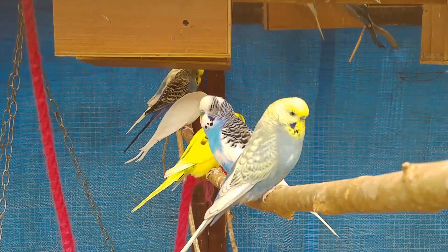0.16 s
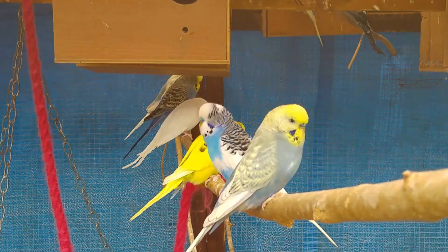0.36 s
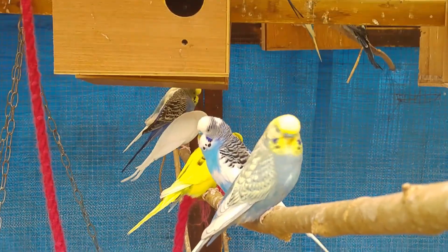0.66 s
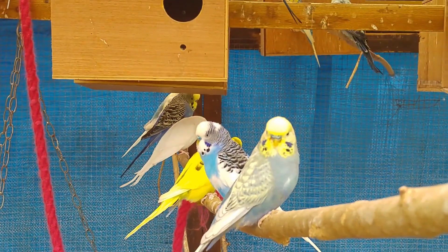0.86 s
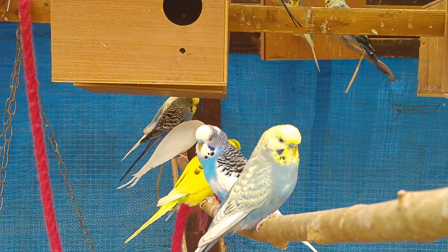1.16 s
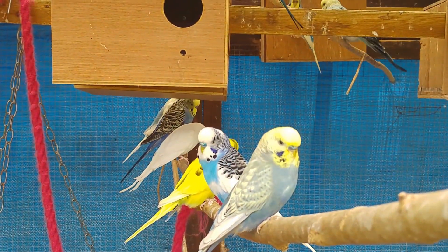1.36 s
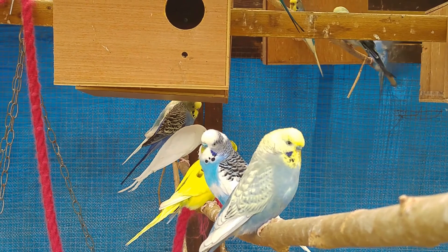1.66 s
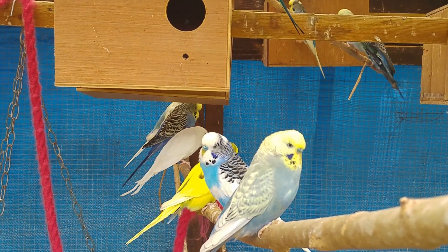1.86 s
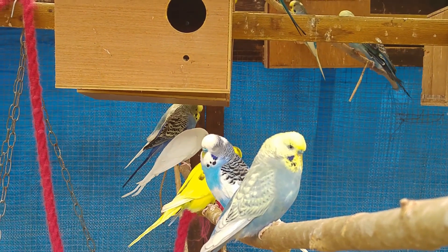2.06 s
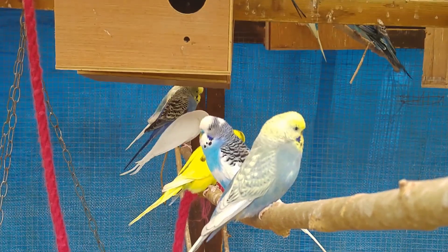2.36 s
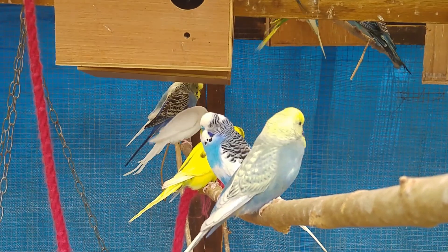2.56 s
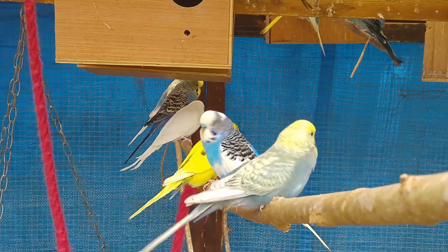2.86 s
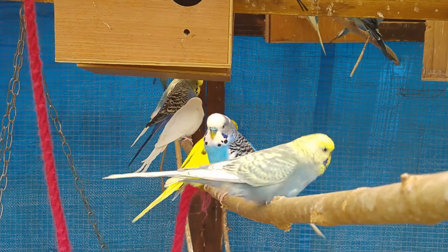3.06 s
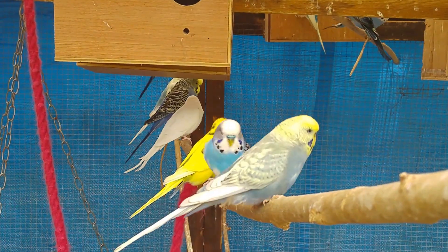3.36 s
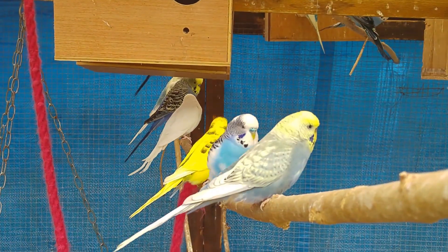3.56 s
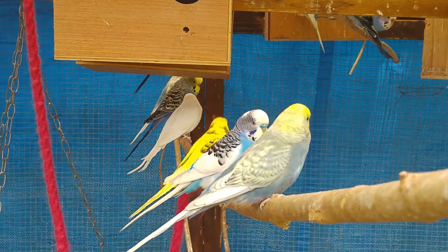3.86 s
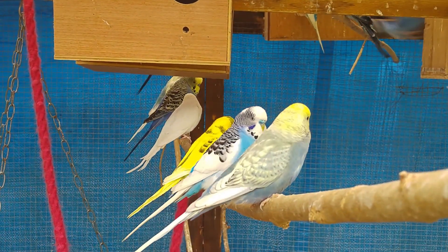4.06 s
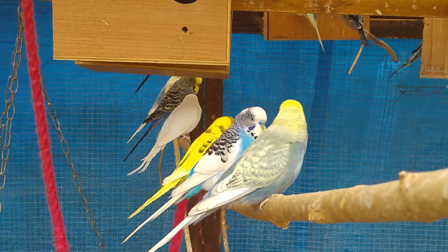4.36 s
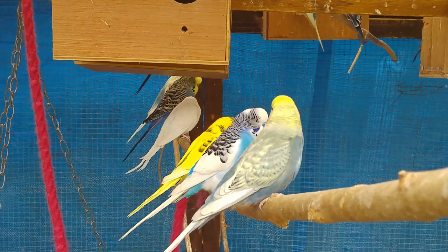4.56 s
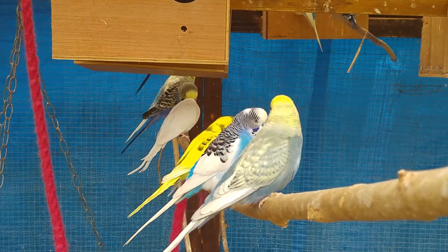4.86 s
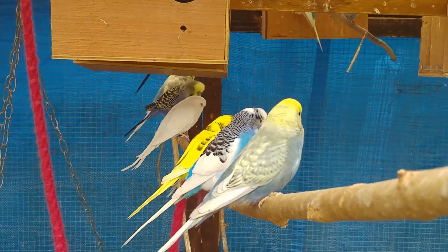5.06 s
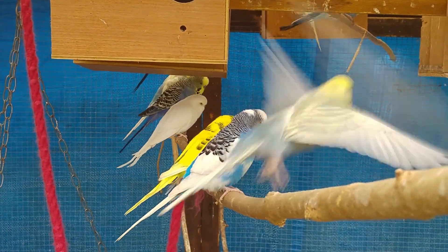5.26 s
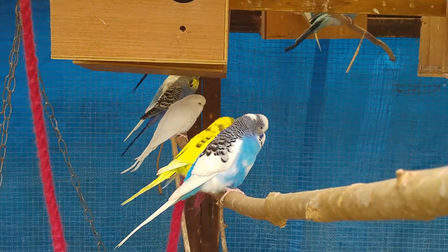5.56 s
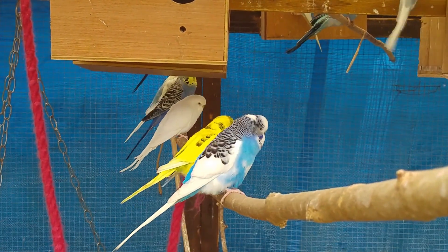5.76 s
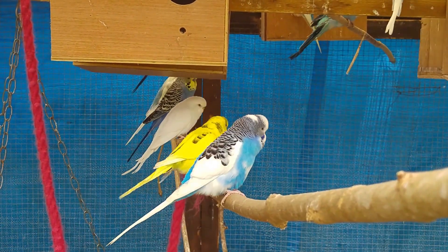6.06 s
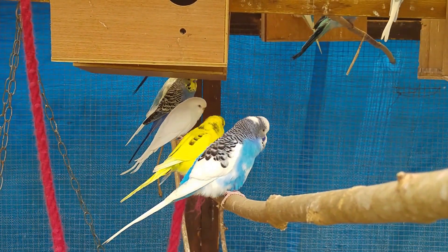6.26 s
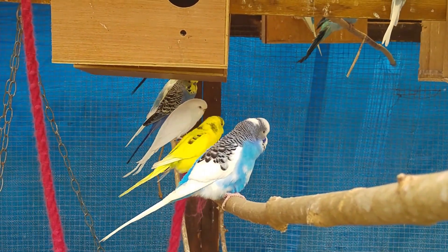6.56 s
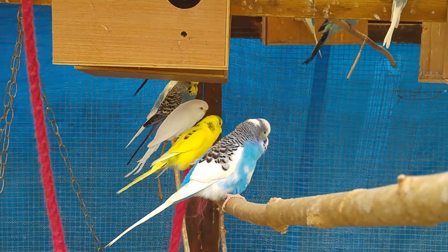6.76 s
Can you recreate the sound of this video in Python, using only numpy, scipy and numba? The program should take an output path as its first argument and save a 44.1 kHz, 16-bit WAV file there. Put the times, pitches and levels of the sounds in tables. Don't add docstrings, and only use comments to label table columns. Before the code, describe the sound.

Dry, bright budgie squawks come several per second, buzzing and hissy, peaking just before a soft burst of wing beats. Then calls become more spaced and throaty, mixed with tiny sliding whistles, low mutters and clicks on wire. Far birds chirp over light wind rumble; the wooden enclosure gives only a short, dull echo near the handheld microphone.

```python
import sys
import numpy as np
from scipy import signal
from scipy.fft import rfft, irfft
from scipy.io import wavfile
from scipy.ndimage import uniform_filter1d, map_coordinates
from numba import njit

SR = 44100
rng = np.random.default_rng(int(sys.argv[2]) if len(sys.argv) > 2 else 0)


def master_out(mix):
    frames = np.transpose(np.atleast_2d(mix))
    ceiling = np.clip(frames, -1, 1)
    pcm = np.round(ceiling * 32767).astype(np.int16)
    wavfile.write(sys.argv[1], SR, pcm)


def invert_db(x):
    u = np.asarray(x, float) / 20
    return 10 ** u


N = 303849
T = np.arange(N) / SR


def unit(x):
    return x / np.sqrt(np.mean(x ** 2))


def noise():
    return rng.standard_normal(N)


def walk(rate):
    hold = max(int(SR / rate), 1)
    steps = np.repeat(rng.standard_normal(N // hold + 1), hold)
    slewed = uniform_filter1d(uniform_filter1d(steps, hold), hold)[:N]
    return slewed / slewed.std()


@njit
def svf(x, hz, width):
    y, b, l = np.empty(len(x)), 0., 0.
    for i in range(len(x)):
        g, k = np.tan(np.pi * hz[i] / SR), width / hz[i]
        v = (b + g * (x[i] - l)) / (1 + g * (g + k))
        b, l, y[i] = 2 * v - b, l + 2 * g * v, k * v
    return y


def band(x, hz, width):
    hz = np.clip(hz + 0 * T, 20, .45 * SR)
    once = svf(x, hz, 1. * width)
    return unit(svf(once, hz, 1. * width))


def colour(x, points):
    hz, db = np.transpose(points)
    f = np.arange(N // 2 + 1) * SR / N + 1
    gain = invert_db(np.interp(np.log(f), np.log(hz), db))
    return unit(irfft(rfft(x) * gain, N))


def mottle(x, depth_db, rate):
    f, t, z = signal.stft(x, SR, nperseg=256)
    grid = np.meshgrid(f / 330, t * rate, indexing="ij")
    field = map_coordinates(rng.standard_normal((80, 800)), grid, order=1, mode="mirror")
    z = z * invert_db(depth_db * field / field.std())
    return unit(signal.istft(z, SR, nperseg=256)[1][:N])


def throb(hz, sharp, scatter_db):
    phase = np.cumsum(hz) / SR
    size = invert_db(scatter_db * rng.standard_normal(N // 50))[phase.astype(int)]
    phase = (phase % 1) ** .6
    bump = np.exp(sharp * np.cos(2 * np.pi * (phase - .5)))
    return size * bump / np.sqrt(np.i0(2 * sharp))


def syrinx(beak_hz):
    beat_hz = beak_hz / 3 * (1 + .04 * walk(600) + .02 * walk(60))
    beat = 2 * np.pi * np.cumsum(beat_hz) / SR
    buzz = sum(np.cos(k * beat) for k in range(1, 8))
    return .35 * unit(buzz) + noise()


def lungs(start, end, peak_db, place):
    swell_db, fade_db = 11, 14.5
    attack, release = 0.14, 0.16
    gain = np.zeros(N)
    for a, b, db, top in zip(start, end, peak_db, place):
        on = slice(int(max(a - .002, 0) * SR), int((b + .01) * SR))
        to_top = (T[on] - a) / (b - a) - top
        corners = [a - .002, a + 0.0051, a + attack * (b - a), b - release * (b - a), b, b + 0.017]
        edges_db = np.interp(T[on], corners, [-17.0, -3.0, -0.5, 3, -4.0, -20])
        gain[on] += invert_db(db + edges_db + np.minimum(swell_db * to_top, -fade_db * to_top))
    return gain


def squawks():
    # start and end in seconds, peak in
    # dB, place of the peak (0-1), beak resonance it snaps to in Hz.
    scolding = [(0.0, 0.054, -16, 0, 7240), (0.087, 0.199, -15, 0.4, 5860),
                (0.273, 0.363, -14.5, 0.21, 6164), (0.388, 0.435, -20, 0.47, 6930),
                (0.442, 0.504, -16, 0.31, 6980), (0.501, 0.561, -18, 0.34, 6104),
                (0.568, 0.629, -15.5, 0.48, 6980), (0.64, 0.745, -13, 0.74, 7240),
                (0.769, 0.862, -18, 0.61, 7150), (0.917, 0.991, -16, 0.53, 5900),
                (1.044, 1.106, -17, 0.57, 6980), (1.172, 1.234, -15.5, 0.33, 6980),
                (1.23, 1.282, -19.5, 0.52, 6460), (1.296, 1.359, -15.5, 0.42, 6930),
                (1.401, 1.491, -16, 0.59, 7240), (1.487, 1.559, -16.5, 0.43, 6550),
               (1.566, 1.636, -13.5, 0.2, 6980), (1.664, 1.798, -16, 0.49, 6450),
               (1.842, 1.969, -16, 0.64, 6070), (2.006, 2.13, -15.5, 0.75, 6340),
               (2.128, 2.211, -23, 0.81, 6890), (2.204, 2.319, -15, 0.53, 6720),
               (2.328, 2.405, -14.5, 0.3, 7420), (2.434, 2.527, -9, 0.63, 7060),
               (2.566, 2.717, -14, 0.86, 6458), (2.723, 2.765, -25.5, 0.48, 9870),
               (2.79, 2.905, -12.5, 0.7, 6750), (2.905, 2.975, -10.5, 0.54, 4270),
               (2.99, 3.128, -11.5, 0.97, 6036)]
    answering = [(3.448, 3.545, -17.5, 0.33, 3450), (3.683, 3.765, -37, 0.52, 3400),
                 (3.835, 3.885, -14.5, 0.65, 4800), (3.955, 4.08, -16.5, 0.58, 4840),
                 (4.128, 4.182, -10, 0.4, 3830), (4.195, 4.252, -21.5, 0.4, 3040),
                 (4.448, 4.508, -11.5, 0.55, 3950), (4.64, 4.702, -31, 1, 3410),
                 (4.903, 5.019, -27, 0.46, 3400), (5.019, 5.113, -22, 0.36, 3070),
                 (5.14, 5.21, -17, 0.5, 4470), (5.306, 5.353, -18, 0.5, 4990),
                 (5.432, 5.502, -12.5, 0.08, 3200), (5.491, 5.563, -19, 0.4, 2790),
                 (5.663, 5.751, -11, 0.49, 6910), (5.893, 5.986, -18.5, 0.56, 3134),
                 (6.04, 6.112, -14, 0.39, 4280), (6.155, 6.225, -16, 0.56, 4110),
                 (6.264, 6.308, -13.5, 0.54, 3864), (6.311, 6.381, -14, 0.31, 4060),
                 (6.413, 6.544, -15, 0.53, 3840), (6.564, 6.644, -14, 0.49, 4060),
                 (6.739, 6.816, -13.5, 0.47, 3980)]
    answer_beak_hz = [7060, 6720, 6850, 5210, 6800, 6550, 5900, 6590, 7280, 6630, 7404, 5900, 6330, 5900,
                      7110, 6140, 5940, 6930, 7980, 7360, 7300, 6800, 6850]
    # opening beak resonance in Hz, beak ring in dB, breath brightness in dB.
    gapes = [(6890, -7, 7), (7076, -2, 7.5), (6720, 3, 2.5), (6980, 11.5, 1), (6890, 3, 7), (7110, 4, -3),
             (6930, 1, 2), (6800, -6, -14.5), (6550, 2.5, -3), (7060, -4, -4), (5940, 1, 3), (6980, 3, 7),
             (7060, -6, -4), (6930, 1, 5), (7207, -1, 4), (6890, -1, -2), (5617, 4, 2.5), (6980, 2, -0.5),
             (6720, -2, -2), (7150, -5, -3), (7280, 11.5, 4), (7504, -10, 3), (7240, 3, 3), (6402, -1, -6),
             (7110, 0, -9), (7110, -4, -5), (7150, 0, -8), (6192, 2, 5.0), (7040, -2, 1), (6720, -6, 1),
             (6590, 4, 1), (5370, -5, 4), (6550, -3, 4), (6717, 5.5, -6), (6890, -1, 0.0), (6635, -7, 3),
             (6630, -5, 4), (7010, 5, -7), (6660, -1, 2), (6330, -1.5, -17), (6330, 7.5, 4), (6490, 1.5, 0),
             (6730, -1, 3), (7280, 9.5, -6.0), (5210, 6, 3), (5900, -3, 5), (7540, 3, 3), (6890, -5, 7),
             (7485, 11.5, 4.5), (5860, -20, 2), (7680, -7, 1), (6850, -14, 0)]
    # resonance in Hz, strength in dB.
    chests = [(2390, -3), (2150, 4.5), (2130, 8), (2360, -1), (2200, -1), (2090, -4), (2240, 0),
              (2200, -1.5), (2280, 5), (2150, 0), (2200, -4), (2200, -5), (2100, -13), (2057, -1),
              (2150, -3), (2280, -4.5), (2150, -3), (2150, 1.5), (2150, 0), (1658, 2.5), (2200, -12),
              (1770, 4), (2240, -22), (2270, -7.5), (2240, -4.5), (2200, 2), (2200, -11), (2350, -6),
              (1780, -1.5), (2368, -10), (2280, 16), (2520, 0), (2240, 1), (1690, 6), (2200, 1),
              (2200, -16), (2240, 16), (1720, 12), (2200, 8), (1476, 4), (1728, 3), (2390, 5), (2280, -12),
              (1503, -2), (2280, 4), (2240, 2), (2200, -1.5), (2200, -2), (2280, -0.5), (2200, 1),
              (2025, 0.5), (2150, -1)]
    rasps = [0.27, 0.34, 0.26, 0.83, 0.32, 0.37, 0.32, 0.1, 0.22, 0.34, 0.32, 0.41, 0.61, 0.53, 0.44, 0.44,
             0.27, 0.2, 0.41, 0.17, 0.71, 0.14, 0.19, 0.31, 0.22, 0.94, 0.26, 0.22, 0.58, 0.08, 0.07, 0.2,
             0.02, 0.12, 0.14, 0.1, 0.05, 0.12, 0.12, 0.1, 0.26, 0.12, 0.2, 0.51, 0.15, 0.26, 0.17, 0.29,
             0.37, 0.07, 0.14, 0.02]
    # time in seconds, turn away from the phone (0-1).
    head = [(0, 0.96), (.3, 0.04), (1.1, 0.04), (1.898, 0.13), (2.27, 0.57), (2.599, 0.21), (2.85, 0.16),
            (2.95, 0.8), (3.1, 0.47), (3.5, 0.45), (4.2, 0.87), (4.5, 0.16), (5.051, 1), (5.2, 0.13),
            (5.7, 0.55), (5.95, 1), (6.4, 0.91), (6.85, 0.87)]
    # frequency in Hz, level in dB per Hz.
    voice = [(530, -43), (900, -30.5), (1700, -36), (2140, -24), (2500, -19), (2890, -10), (4520, -10),
             (7060, 1), (7960, -5.5), (9770, -19.5), (16000, -46.5)]

    start, end, peak_db, place, tract_hz = np.transpose(scolding + answering)
    answers = start >= answering[0][0]
    early_hz, ring_db, bright_db = np.transpose(gapes)
    chest_hz, full_db = np.transpose(chests)
    late_hz = np.r_[tract_hz[~answers], answer_beak_hz]
    throat_hz = np.where(answers, tract_hz, 4050)
    rasp = np.array(rasps)
    turn = np.clip(np.interp((start + end) / 2, *np.transpose(head)), 0, 1)

    def turned(facing, away):
        return facing + (away - facing) * turn

    throat_db, chest_db = turned(-21, -6.5), turned(-16, -13.5)
    hiss_db, air_db = turned(0, -27), turned(-27, -30.5)
    palate_db, palate_hz = turned(-22, -29), turned(9960, 8170)
    beak_db = turned(-2.5, -14)
    shade = np.clip(turned(0.29, 0.73), 0, 1)

    which = np.clip(np.searchsorted(start - .012, T) - 1, 0, None)
    along = (T - start[which]) / (end - start)[which]
    snap = np.clip(9 * along - 4.3, 0, 1)
    beak_hz = early_hz[which] + (late_hz - early_hz)[which] * snap
    gain = lungs(start, end, peak_db, place)

    buzz = syrinx(beak_hz)
    puff_hz = 175.4 * (1 + .04 * rng.standard_normal(len(start))[which] + .02 * walk(150))
    early = np.clip(1 - 2 * along, 0, 1)
    sharp = (.04 + rasp[which]) * (1.25 + .55 * early)
    source = buzz * throb(puff_hz, sharp, scatter_db=1.2)

    body = mottle(colour(source, voice), depth_db=3.1, rate=24)
    body = body - shade[which] * svf(body, 6900 + 0 * T, 1600.0)
    beak = band(source, beak_hz * (1 + .03 * walk(70)), width=1250)
    beak = beak * invert_db(2.5 * walk(40) + (beak_db + ring_db)[which])
    throat = band(source, throat_hz[which] * (1 + .03 * walk(40)), width=1100)
    throat = throat * invert_db(throat_db[which] - 3 + 1.5 * walk(50))
    chest_glide = .96 + .08 * np.clip(along, 0, 1) + .04 * walk(30)
    chest = band(source, chest_hz[which] * chest_glide, width=420)
    chest = chest * invert_db((chest_db + full_db)[which] - 6 + 2.5 * walk(40))
    hiss = mottle(band(source, 7000, width=13200), depth_db=1.0, rate=14)
    hiss = hiss * invert_db((hiss_db + .5 * bright_db)[which] - 3.5)
    palate = band(source, palate_hz[which] * (1 + .03 * walk(30)), width=1400)
    palate = palate * invert_db(palate_db[which] + 3 * walk(25))
    air = band(np.roll(source, 70), 13800 * (1 + .08 * walk(12)), width=4000)
    air = air * invert_db((air_db + 1.6 * bright_db)[which] + 2 + 3 * walk(30))
    return gain * (invert_db(3.5) * body + beak + throat + chest + hiss + palate + air)


def whistles():
    # start and end in seconds, first and second pitch in Hz, dB.
    hooks = [
        (4.151, 4.16, 3050, 2803, -8.5),
        (4.522, 4.551, 2690, 3294, -8),
        (4.552, 4.575, 3273, 2776, -12.5),
        (5.402, 5.421, 2600, 2686, -18.5),
        (5.416, 5.442, 2790, 2910, -14.5),
        (5.598, 5.645, 3900, 3230, -27.5),
        (5.943, 5.96, 3090, 2870, -24),
    ]
    drops = [
        (4.082, 4.103, 2830, 3036, -14),
        (4.1, 4.113, 3090, 2720, -11),
        (5.014, 5.029, 3120, 2713, -14.5),
        (5.959, 5.99, 3155, 2740, -16),
        (4.9, 5.03, 853, 967, -32),
        (5.374, 5.415, 893, 1161, -28),
    ]
    arches = [
        (4.616, 4.65, 2660, 2770, -35.5),
        (4.993, 5.016, 2954, 2716, -16),
        (5.032, 5.056, 2840, 3050, -15.5),
        (5.07, 5.086, 3000, 2800, -22.5),
        (5.642, 5.671, 2506, 2548, -26),
        (5.992, 6.008, 2940, 3270, -15),
    ]
    single_notes = [(1.64, 2, 1830, 1634, -40), (3.34, 3.7, 2900, 3750, -42), (3.595, 3.648, 4990, 4950, -34),
                    (3.835, 3.863, 257, 251.6, -28.5), (4.124, 4.143, 3340, 2820, -9.5),
                    (4.272, 4.292, 1030, 1114, -25.5), (4.641, 4.667, 2490, 2720, -29.5),
                    (4.697, 4.8, 5980, 6460, -31.5), (4.75, 4.787, 972, 800, -36.5),
                    (4.772, 4.801, 2260, 2220, -26.5), (4.8, 4.862, 1000, 1100, -42),
                    (4.935, 4.965, 1600, 1780, -30.5), (5.36, 5.419, 6117, 6236, -29),
                    (5.454, 5.475, 3413, 3000, -19.5), (5.665, 5.698, 1447, 1585, -28.5),
                    (4.54, 4.565, 245, 225, -42.5), (3.604, 2.4, 4600, 4270, -40),
                    (3.628, 3.657, 5680, 5100, -45), (4.8, 4.4, 710, 1155, -43), (3.72, 3.8, 830, 740, -43.5),
                    (5.366, 5.4, 1700, 2800, -37), (4.815, 4.4, 1600, 1150, -40), (5.48, 5.495, 2650, 2600, -27),
                    (5.695, 5.74, 2700, 3700, -33), (4.975, 5.0, 2600, 2700, -22), (4.6, 4.62, 3300, 3200, -37)]
    more_notes = [(0.05, 0.1, 2700, 2050, -35.5), (0.228, 0.274, 4980, 3950, -29),
                  (1.008, 1.045, 2530, 2678, -36), (2.723, 2.74, 1091, 865, -35.5),
                  (3.9, 3.915, 3690, 3440, -29), (3.924, 3.936, 2280, 2820, -25.5),
                  (3.937, 3.952, 3640, 3560, -27), (3.948, 3.99, 2880, 2810, -32),
                  (3.99, 4.031, 1444, 1716, -33), (4.273, 4.322, 2100, 2380, -35),
                  (4.357, 4.369, 4170, 4050, -29.5), (4.385, 4.387, 2240, 2250, -25),
                  (4.452, 4.485, 951, 1287, -40.5), (4.582, 4.605, 1948, 1543, -39),
                  (4.66, 4.697, 3846, 2960, -33), (4.86, 4.9, 1206, 1001, -41), (5.028, 5.052, 1259, 1048, -32),
                  (4.158, 4.182, 5900, 5900, -26), (5.838, 5.852, 7050, 6800, -37),
                  (5.83, 5.855, 4620, 4600, -50), (3.39, 3.44, 7500, 7550, -50), (4.4, 4.45, 2046, 2150, -40),
                  (3.74, 3.83, 3150, 3030, -41), (4.8, 4.85, 6424, 6350, -52), (4.86, 4.91, 2280, 2200, -45),
                  (4.71, 4.74, 2670, 2953, -37.5), (4.743, 4.762, 1540, 1344, -39),
                  (5.111, 5.165, 1870, 1246, -31), (5.186, 5.213, 797, 1050, -34),
                  (5.218, 5.29, 1275, 1148, -41), (5.574, 5.596, 2700, 1400, -36),
                  (6.139, 6.182, 4050, 4030, -30.5), (6.001, 6.019, 1720, 963, -35),
                  (6.07, 6.083, 1091, 892, -40)]
    overtones_db = [-21, -38]
    shapes = [(hooks, 1, 1), (drops, 0, 1), (arches, 1, 0), (single_notes, .5, 1), (more_notes, .5, 1)]
    out = np.zeros(N)
    waver = .015 * walk(260)
    flutter = invert_db(3 * walk(240))
    for rows, middle, last in shapes:
        for a, b, first_hz, second_hz, db in rows:
            blur = 1 + first_hz / 2600 if db < -24 else 1
            middle_hz, last_hz = first_hz + (second_hz - first_hz) * np.array([middle, last])
            on = slice(int(a * SR), int(b * SR))
            t = T[on]
            hz = np.interp(t, [a, (a + b) / 2, b], [first_hz, middle_hz, last_hz])
            hz = hz * (1 + min(1, 2800 / first_hz) * waver[on])
            phase = 2 * np.pi * np.cumsum(hz) / SR
            rise, fall_s = (.3, 0.083 * (b - a)) if blur > 1 else (.55, .0015)
            swell = np.clip((t - a) / (rise * (b - a)), 0, 1) * np.clip((b - t) / fall_s, 0, 1)
            tone = np.sin(phase)
            for k, partial_db in enumerate(overtones_db, 2):
                partial = np.sin(k * phase + 3 * np.log(flutter[on]))
                tone = tone + invert_db(partial_db - 7.0 * (blur - 1)) * partial
            rough = flutter[on] ** (0.73 + 0.22 * (blur - 1))
            out[on] += np.sqrt(2) * invert_db(db) * swell * tone * rough
    return out


def wings():
    # time in seconds, level in dB.
    beats = [
        (2.875, -18.5),
        (2.931, -10),
        (2.985, -12),
        (3.04, -46),
        (3.085, -31),
        (3.219, -40),
        (4.139, -27),
        (4.3, -25),
        (5.399, -37),
        (5.75, -30.5),
    ]
    out, t = np.zeros(N + SR), T[:SR // 4]

    def ring(hz, t60_s):
        decay = np.exp(-np.log(1000) * t / t60_s)
        return np.sin(2 * np.pi * hz * t) * decay * np.clip(t / 0.0043, 0, 1)

    for (when, db), (a, b) in zip(beats, rng.standard_normal((len(beats), 2))):
        push = ring(62 * (1 + 0.14 * a), t60_s=0.049)
        knock = invert_db(0.5) * ring(397 * (1 + 0.027 * b), t60_s=0.072)
        i = int(when * SR)
        out[i:i + len(t)] += invert_db(db) * (push + knock)
    return out[:N]


def ticks():
    # time in seconds, level in dB, centre in Hz.
    taps = [(3.179, -42, 10000), (3.2895, -42, 10000), (3.309, -39, 8500), (3.368, -44, 7500),
            (3.406, -42, 9580), (3.599, -42, 10600), (3.773, -37, 10500), (4.3228, -24, 4500),
            (4.39, -27, 4510), (4.554, -18, 6000), (4.683, -23, 4140), (4.746, -39, 4980),
            (4.866, -33, 5020), (4.954, -29, 4570), (5.809, -48, 11000), (5.818, -52, 10980),
            (6.004, -34, 5980), (5.37, -29, 2200), (5.381, -22, 2560), (5.393, -22, 2400)]
    when, db, hz = np.transpose(taps)
    gain = np.zeros(N)
    for s, d in zip(when, db):
        decay = np.exp(-np.clip(T - s, 0, 1) / 0.0058)
        gain += invert_db(d) * decay * (T >= s) * (T < s + .03)
    order = np.argsort(when)
    latest = np.clip(np.searchsorted(when[order], T, side="right") - 1, 0, None)
    return gain * band(noise(), hz[order][latest], width=4000)


def babble(lo_hz, hi_hz, long_s, scatter_db, count):
    out = np.zeros(N + SR)
    for when, pitch, glide, length, size in rng.random((count, 5)):
        t = np.arange(int(SR * long_s * (0.28 + length))) / SR
        hz = lo_hz * (hi_hz / lo_hz) ** pitch * (1 + .5 * (glide - .5) * t / t[-1])
        chirp = np.hanning(len(t)) * np.sin(2 * np.pi * np.cumsum(hz) / SR)
        i = int(when * N)
        out[i:i + len(t)] += invert_db(-scatter_db * np.log(1 - size)) * chirp
    return unit(out[:N])


def muttering(hum_db):
    # start, loudest moment and end in seconds, level in dB.
    murmurs = [
        (3.2, 3.265, 3.4, -36),
        (3.405, 3.76, 3.8, -39),
        (4.115, 4.357, 4.33, -32.5),
        (4.732, 4.972, 5.34, -29),
        (5.55, 5.754, 6.23, -41),
    ]
    gain = invert_db(-51.0 + 1.54 * (hum_db + 41.0))
    for *times, db in murmurs:
        gain = gain + invert_db(np.interp(T, times, [db - 14, db, db - 14], -99, -99))
    chirps = babble(800, 2300, long_s=.04, scatter_db=.7, count=500)
    throats = mottle(band(noise(), 1000, width=650), depth_db=2.5, rate=25)
    return gain * (.35 * chirps + .7 * throats)


def far_flock():
    # frequency in Hz, level in dB per Hz.
    far = [(350, -48), (600, -12), (680, 5), (846, -4), (1660, 3), (1900, 0), (3300, 7.5), (5330, 2),
           (7310, 6), (16000, -29.5)]
    wash = mottle(colour(noise(), far), depth_db=2.6, rate=14)
    wash = wash * invert_db(2 * walk(14) + 2 * walk(170))
    return wash + .38 * babble(2400, 3800, long_s=.022, scatter_db=1.2, count=500)


def perch_hum():
    modes = band(noise(), 400, width=170) + .4 * band(noise(), 280, width=120)
    return modes * invert_db(2.5 * walk(30) + 2.5 * walk(11))


def wind():
    rumble = band(noise(), 59.6, width=49) + 0.77 * band(noise(), 141, width=190)
    return rumble * invert_db(1.5 + 2 * walk(9))


def surroundings():
    # time in seconds, draught of wings, shaking of the perch and calling of the far birds in dB.
    stir = [(0, -59.5, -66, -39.5), (0.75, -52, -60, -39), (.95, -50, -44, -42.5),
            (1.45, -48, -50.5, -41.5), (1.75, -59, -58, -41.5), (2.3, -49, -43.5, -35),
            (2.78, -54, -51.5, -39), (2.881, -35, -30, -28), (3.03, -38, -31, -30.5),
            (3.199, -45.5, -42.5, -43), (3.9, -44, -45.5, -32.5), (4.28, -42, -36, -31),
            (4.5, -50.5, -58.5, -32.5), (4.802, -49, -55, -43), (5.27, -47, -55, -36.5),
            (5.421, -39, -51, -29.5), (5.8, -44, -53, -38.5), (6.89, -53, -64.5, -38)]
    s, *columns = np.transpose(stir)
    wind_db, hum_db, far_db = (np.interp(T, s, c) for c in columns)
    astir = invert_db(wind_db) * wind() + invert_db(hum_db) * perch_hum() + invert_db(far_db) * far_flock()
    hiss = invert_db(-60) * band(noise(), 15000, width=8700)
    return astir + muttering(hum_db) + ticks() + hiss


def board(x):
    # from when in seconds, extra path in m, gain.
    places = [
        (0, .49, .2),
        (6.02, 1.046, .45),
    ]
    since, path_m, gain = np.transpose(places)
    place = np.searchsorted(since, T, side="right") - 1
    delay = (path_m[place] / 343 * SR).astype(int)
    late = np.clip(np.arange(N) - delay, 0, None)
    return (x + gain[place] * x[late]) / np.sqrt(1 + gain[place] ** 2)


def aviary(x, t60_s, wet_db):
    t = T[:SR // 3]
    tail = rng.standard_normal(len(t)) * np.exp(-np.log(1000) * t / t60_s) * (t > .003)
    tail = signal.lfilter([.6], [1, -.4], tail)
    tail = tail / np.sqrt(np.sum(tail ** 2))
    return x + invert_db(wet_db) * signal.fftconvolve(x, tail)[:N]


def scene():
    callers = aviary(board(squawks()), t60_s=.115, wet_db=-14)
    warblers = aviary(whistles(), t60_s=.2, wet_db=-14)
    return (callers + warblers + wings() + surroundings())[None]


def band_limit(x):
    return signal.sosfilt(signal.butter(12, 15960, fs=SR, output="sos"), x)


def record(dry):
    # centre in Hz, width in Hz.
    notches = [(600, 55), (1870, 20), (2480, 70), (7800, 175)]
    bass_cut = signal.butter(3, 42, "high", fs=SR, output="sos")
    heard = signal.sosfilt(bass_cut, dry)
    for hz, width in notches:
        heard = signal.lfilter(*signal.iirnotch(hz, hz / width, SR), heard)
    ceiling = .9
    rounded = ceiling * np.tanh(0.82 * heard / ceiling)
    top_cut = signal.ellip(8, .2, 60, 15900, fs=SR, output="sos")
    mix = signal.sosfilt(top_cut, rounded)
    return band_limit(mix)


dry = scene()
out = record(dry)
master_out(out)
```